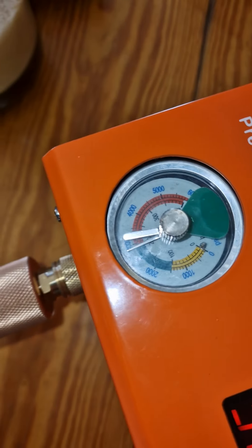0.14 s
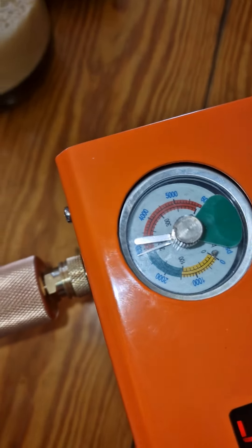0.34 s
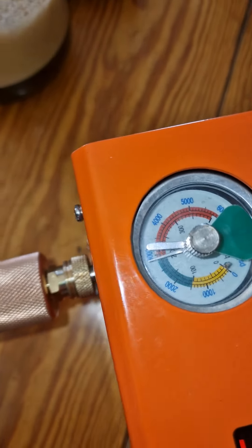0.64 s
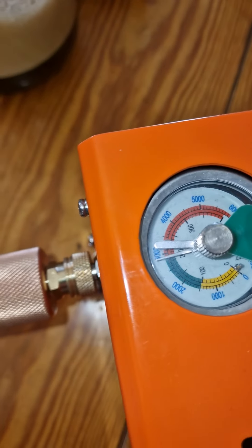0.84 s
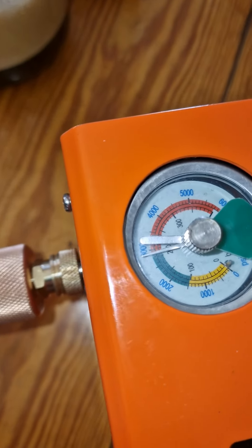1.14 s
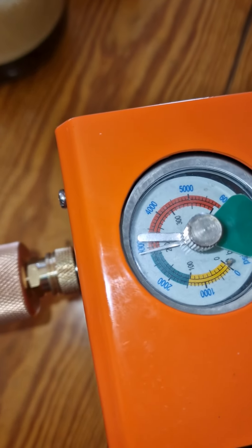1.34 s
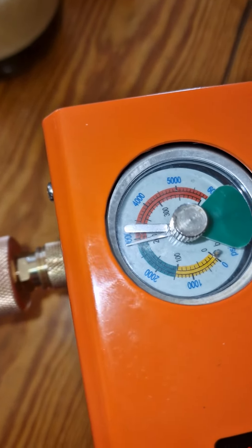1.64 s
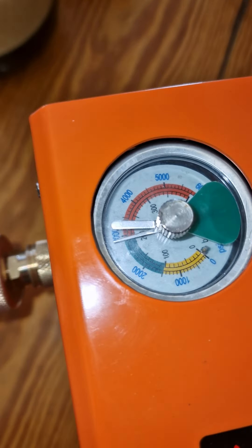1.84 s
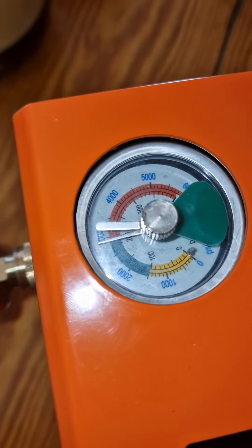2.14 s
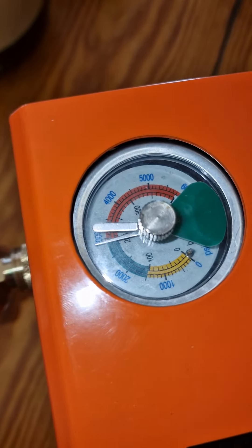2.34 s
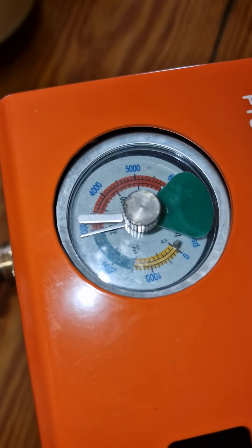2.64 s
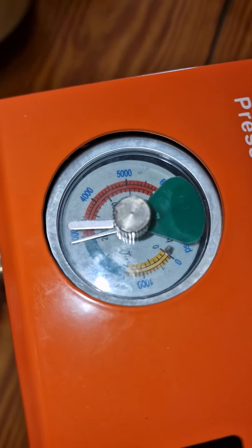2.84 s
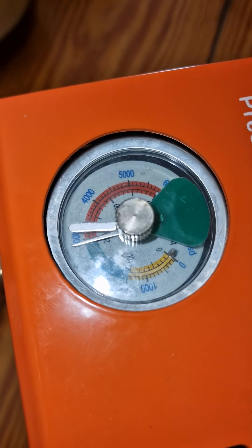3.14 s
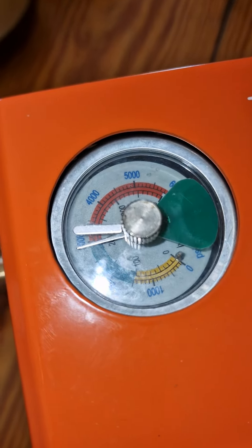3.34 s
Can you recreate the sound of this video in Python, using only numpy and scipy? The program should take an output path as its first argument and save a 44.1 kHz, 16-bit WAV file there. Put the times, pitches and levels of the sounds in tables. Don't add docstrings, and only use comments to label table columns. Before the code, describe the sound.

Close up indoors, a portable air compressor hammers evenly on a wooden table, its sheet-metal case rattling and gears grinding, while a cooling fan hisses and faintly whines toward the left; no start or stop.

```python
import sys
import numpy as np
from scipy import signal
from scipy.fft import rfft, irfft
from scipy.io import wavfile

SR = 44100
rng = np.random.default_rng(int(sys.argv[2]) if len(sys.argv) > 2 else 0)


def put_to_file(sound):
    columns = np.atleast_2d(sound).T
    safe = np.clip(columns, -1, 1)
    whole_steps = np.round(safe * 32767)
    wavfile.write(sys.argv[1], SR, whole_steps.astype(np.int16))


def gain_from_db(level_db):
    decades = np.asarray(level_db, float) / 20
    return 10 ** decades


N = 154350
TIME = np.arange(N) / SR
LEFT_RIGHT = np.array([[1], [-1]])
RIGHT_ONLY = np.array([[0], [1]])


def rms_one(x):
    return x / np.sqrt(np.mean(x ** 2) + 1e-20)


def stereo_db(left_db, right_db):
    return np.array([[left_db], [right_db]])


def at_hz(points, hz):
    point_hz, point_db = np.transpose(points)
    return np.interp(np.log(hz), np.log(point_hz), point_db)


def drift(rate_hz):
    r = np.exp(-80 * np.pi * rate_hz / SR)
    steps = rng.standard_normal(N // 40 + 2002)
    slow = signal.lfilter([1], [1, -2 * r, r * r], steps)[2000:]
    return np.interp(np.arange(N) / 40, np.arange(len(slow)), rms_one(slow - slow.mean()))


def ring(x, hz, t60):
    r, w = gain_from_db(-60 / (t60 * SR)), 2 * np.pi * hz / SR
    return signal.lfilter([0, np.sin(w)], [1, -2 * r * np.cos(w), r * r], x + 1e-18)


def soft(x, cut_hz):
    return signal.sosfilt(signal.butter(2, cut_hz, fs=SR, output="sos"), x)


def high_pass(x, cut_hz, order=2):
    return signal.sosfilt(signal.butter(order, cut_hz, "high", fs=SR, output="sos"), x)


def band_pass(x, low_hz, high_hz):
    return signal.sosfilt(signal.butter(2, [low_hz, high_hz], "band", fs=SR, output="sos"), x)


def clicks(s, height):
    i, out = (np.ravel(s) * SR).astype(int), np.zeros(N)
    inside = (i >= 0) & (i < N)
    np.add.at(out, i[inside], np.ravel(height)[inside])
    return out


HIT_JITTER_S, HIT_SPREAD_DB = .0005, 1.5
# start in seconds, strength in dB.
CRANK_TURNS = [(-.102, -2.5), (.100, -2.5), (.3007, -1.5), (0.5023, -2.5), (.705, -2), (0.9086, -2),
               (1.1104, -2.5), (1.3133, -3), (1.5171, -2.5), (1.7179, -2.5), (1.9218, -2), (2.1225, -2.5),
               (2.3243, -2.5), (2.5279, -2.5), (2.7299, -2.5), (2.9324, -2.5), (3.1368, -1.5), (3.338, -2),
               (3.540, 0)]
# seconds into the turn, rattle length in seconds,
# then level in dB in the low, middle and high group of case modes.
KNOCKS_PER_TURN = [
    (0.011, .0055, -10, -6.5, -14.5),
    (0.046, 0.0064, -10.5, -12.5, -7.5),
    (0.11, .008, -10, -11, -10),
    (.143, 0.00601, -15, -9.5, -20.5),
]
KNOCK_GROUPS = [920, 1550, 2270]
FAVOURED_MODES = [(780, 940, 1440, 2105), (910, 1165, 1845, 2320), (1020, 1500, 1610, 1845),
                  (1500, 1165, 1020, 1440)]
# frequency in Hz, t60 in seconds, left level in dB, right level in dB.
CASE_MODES = [(692.4, 0.053, -8.5, -7.5), (782, 0.039, 4, -4.5), (917, 0.048, -16.5, 7),
              (1028, 0.025, 1, 4.5), (1169, 0.095, -6.5, -3), (1407, 0.055, -12, 6.5),
              (1503, 0.051, 4, -5.5), (1598, 0.056, -0.5, 4), (1872, 0.023, -2, 5),
              (2075, 0.056, -0.5, -19), (2287, 0.013, -16.5, 5), (562, 0.013, -10.5, -29.5),
              (2670, 0.014, 1, -16.5)]


def case(teeth, grind):
    favour_db, bounce_s, bounce_db = 4, .005, -8
    knock_damping, knock_cut_hz, tooth_cut_hz = 0.51, 2700, 1200
    teeth_db, grind_db = -24.5, -20.5
    turn_s, turn_db = np.transpose(CRANK_TURNS)
    knocks = np.array(KNOCKS_PER_TURN)
    jitter = HIT_JITTER_S * rng.standard_normal((len(turn_s), len(knocks)))
    begin = turn_s[:, None] + knocks[:, 0] + jitter
    habit = rng.random((len(CASE_MODES), len(knocks))) ** 1.4
    struck, geared, ground = np.zeros((3, 2, N))
    teeth = soft(teeth, tooth_cut_hz)
    for k, (hz, t60, left_db, right_db) in enumerate(CASE_MODES):
        group_db = np.array([at_hz(np.transpose([KNOCK_GROUPS, row[2:]]), hz) for row in knocks])
        favoured = np.any(abs(np.array(FAVOURED_MODES) / hz - 1) < .04, axis=1)
        spread_db = HIT_SPREAD_DB * rng.standard_normal(begin.shape)
        db = turn_db[:, None] + group_db + favour_db * favoured + spread_db
        s = begin + knocks[:, 1] * habit[k]
        bounce_at = s + bounce_s * (.5 + rng.random(s.shape))
        hits = clicks(s, gain_from_db(db)) + clicks(bounce_at, gain_from_db(db + bounce_db))
        side = gain_from_db(stereo_db(left_db, right_db)) * [[1], [(-1) ** k]]
        struck += side * ring(hits, hz, t60 * knock_damping) * (-1) ** (k // 2)
        geared += side * ring(teeth, hz, t60)
        ground += side * ring(grind, hz, t60)
    rung = soft(struck, knock_cut_hz)
    rung = rung + gain_from_db(teeth_db) * rms_one(geared) + gain_from_db(grind_db) * rms_one(ground)
    return high_pass(rung, 300)


# seconds into the turn, level in dB under 200 Hz, level in dB above,
# sign of the push, centre of the ringing in Hz.
THUMPS_PER_TURN = [
    (.0205, -17.5, -13.5, -1, 260),
    (.028, -27, -7, 1, 271.4),
    (.041, -12, -22, -1, 279),
    (.053, -18, -6, 1, 320.4),
    (.144, -41, -16, 1, 353),
    (.158, -33, -13.5, 1, 324),
]
# frequency in Hz, t60 in seconds, level in dB.
TABLE_MODES = [(68, 0.36, -4), (91.7, 0.45, -11.5), (178, 0.046, -16.5), (188.3, 0.19, -7.5),
               (268.1, 0.24, -7.5), (280.3, 0.16, 0), (307, 0.16, -3), (350, 0.21, -1.5), (426, 0.2, -16)]


def table(teeth):
    contact_cut_hz, hum_db = 750, -24
    aim_width, aim_floor_db = 0.13, -9.5
    turn_s, turn_db = np.transpose(CRANK_TURNS)
    s, low_db, high_db, sign, aim_hz = np.transpose(THUMPS_PER_TURN)
    jitter = HIT_JITTER_S / 4 * rng.standard_normal((len(turn_s), len(s)))
    s = turn_s[:, None] + s + jitter
    soft_teeth = soft(teeth, contact_cut_hz)
    struck, hum = 0, 0
    for hz, t60, mode_db in TABLE_MODES:
        off_aim = np.log(hz / aim_hz) / aim_width
        aimed_db = high_db + np.maximum(-6 * off_aim ** 2, aim_floor_db)
        db, pan_db = (low_db, 3) if hz < 220 else (aimed_db, -4)
        spread_db = HIT_SPREAD_DB * rng.standard_normal(s.shape)
        height = np.sign(sign) * gain_from_db(turn_db[:, None] + db + mode_db + spread_db)
        side = gain_from_db(pan_db * LEFT_RIGHT / 2)
        struck = struck + side * ring(soft(clicks(s, height), contact_cut_hz), hz, t60)
        hum = hum + side * gain_from_db(mode_db) * ring(soft_teeth, hz, t60)
    return struck + gain_from_db(hum_db) * rms_one(hum)


# seconds into the turn, tooth rate in Hz, load in dB,
# share of clear tone in dB.
MESH_IN_TURN = [(0, 310, -2, -6), (.027, 269.8, -2.5, -13), (.062, 325.1, -2.5, -2.5),
                (.098, 280, 0.5, -1.5), (.112, 264.3, -5.5, 5), (.135, 330.6, -2.5, -6),
                (.158, 351.8, -2.5, -7), (.19, 332.9, 1, -5.5), (0.2027, 315.4, -6.5, -12)]
# multiple of the tooth rate, left level in dB, right level in dB.
TOOTH_TONES = [(2, -37, -48), (3, -15, -15.5), (4, -20, -32.5), (5, -35.5, -21.5), (6, -37, -38)]


def gear():
    turn_length_s, speed_wander, rough_db = .2024, 0.0074, 1.5
    turns = np.interp(TIME, np.array(CRANK_TURNS)[:, 0], np.arange(len(CRANK_TURNS)))
    into_turn = turns % 1 * turn_length_s
    s, hz, load_db, clear_db = np.transpose(MESH_IN_TURN)
    tooth_hz = np.interp(into_turn, s, hz) * (1 + speed_wander * drift(15))
    tooth_count = np.cumsum(tooth_hz) / SR
    load = gain_from_db(np.interp(into_turn, s, load_db))
    clear = gain_from_db(np.interp(into_turn, s, clear_db))
    contact = np.diff(np.floor(tooth_count), prepend=0) * gain_from_db(rough_db * rng.standard_normal(N))
    teeth = load * gain_from_db(rough_db * drift(60)) * rms_one(contact - contact.mean())
    tone = 0
    for multiple, left_db, right_db in TOOTH_TONES:
        level = gain_from_db(stereo_db(left_db, right_db) + rough_db * drift(33))
        phase = 2 * np.pi * round(multiple) * tooth_count + (multiple - 1) * RIGHT_ONLY
        tone = tone + level * np.sin(phase)
    grind = np.sqrt(load) * rng.standard_normal((2, N))
    return teeth, load * clear * tone, grind


# frequency in Hz, left level in dB per Hz, right level in dB per Hz.
AIR_SPECTRUM = [(400, 2.5, 3.5), (1450, -9, 1), (3150, -10.5, -15), (5100, -6, -12), (7400, -7, -19),
                (8600, -14, -16.5), (12700, -9.5, -20.5), (15900, -16, -31)]
# multiple of the base pitch, left level in dB, right level in dB.
WHINE_TONES = [(1, -36, -40), (2, -27, -39.5), (3, -36.5, -46), (4, -32, -47), (5, -42, -60)]
# time in seconds, level in dB.
SWELL = [(0, 0.5), (.55, -3.5), (.8, 1), (1.5, 3.5), (1.75, 0.5), (2.199, 2), (2.8, 1.5), (3.5, 3)]


def fan_air():
    edges = 500 * 2 ** (np.arange(17) / 3)
    white = rng.standard_normal((2, 2, N))
    spectrum = np.array(AIR_SPECTRUM)
    together_db = 0.11 * drift(7.9)
    air = 0
    for k, (low, high) in enumerate(zip(edges, edges[1:])):
        hz = np.sqrt(low * high)
        side_db = stereo_db(at_hz(spectrum[:, [0, 1]], hz), at_hz(spectrum[:, [0, 2]], hz))
        level = gain_from_db(side_db + together_db + 0.89 * drift(20))
        air = air + band_pass(white[k % 2], low, high) * level
    return gain_from_db(-21) * rms_one(air)


def fan_rumble():
    middle, edge = band_pass(rng.standard_normal((2, N)), 45, 484)
    return gain_from_db(-29) * rms_one(middle + 0.1 * edge * LEFT_RIGHT)


def fan_whine():
    whine_hz = 1264.6 * (1 + .0005 * drift(9.4))
    phase = 2 * np.pi * np.cumsum(whine_hz) / SR
    swell_db = np.interp(TIME, *np.transpose(SWELL))
    whine = 0
    for multiple, left_db, right_db in WHINE_TONES:
        level = gain_from_db(stereo_db(left_db, right_db) + swell_db + 1.2 * drift(9))
        whine = whine + level * np.sin(round(multiple) * phase + multiple * RIGHT_ONLY)
    return whine


def room(x):
    t60_s, wall_cut_hz = 0.18, 8700
    size = 2 * N
    hz = np.fft.rfftfreq(size, 1 / SR)
    echoes = np.zeros((2, len(hz)), complex)
    for k, lag_s in enumerate(rng.uniform(.012, .04, 12)):
        delay = np.exp(-2j * np.pi * hz * lag_s)
        loop = gain_from_db(-60 * lag_s / t60_s) * delay / (1 + 1j * hz / wall_cut_hz)
        echoes[k % 2] += loop / (1 - loop) * (-1) ** (k // 2)
    return irfft(echoes * rfft(x, size), size)[:, :N] / 2


def scene():
    teeth, tone, grind = gear()
    machine = case(teeth, grind) + table(teeth) + tone
    wet = high_pass(room(machine), 350)
    return machine + gain_from_db(-10.5) * wet + fan_air() + fan_rumble() + fan_whine()


def low_pass(x):
    return signal.sosfilt(signal.butter(12, 16370, fs=SR, output="sos"), x)


def record(dry):
    x = high_pass(dry, 67, order=4)
    x = signal.sosfilt(signal.ellip(8, .5, 60, 16100, fs=SR, output="sos"), x)
    peak = 1.25
    mix = np.clip(peak * np.tanh(x / peak), -1, 1)
    return low_pass(mix)


dry = scene()
out = record(dry)
put_to_file(out)
```